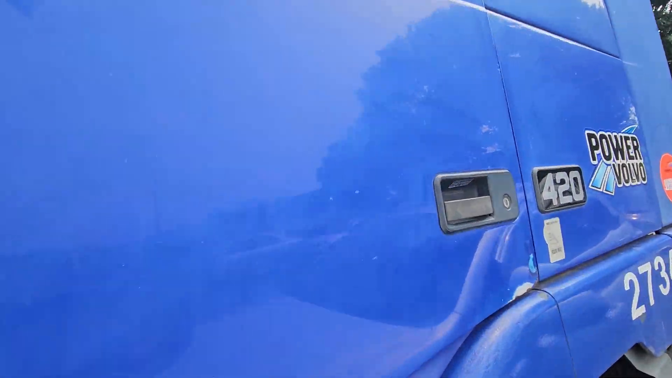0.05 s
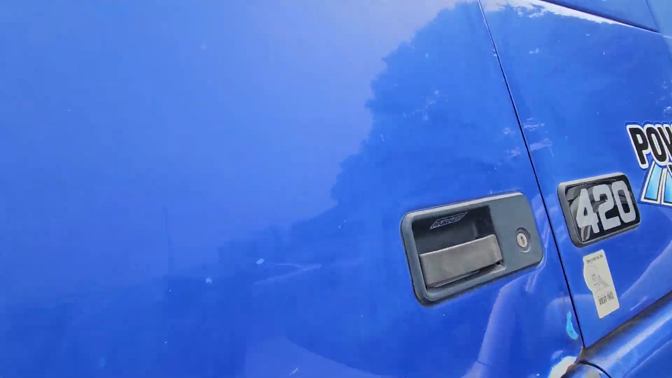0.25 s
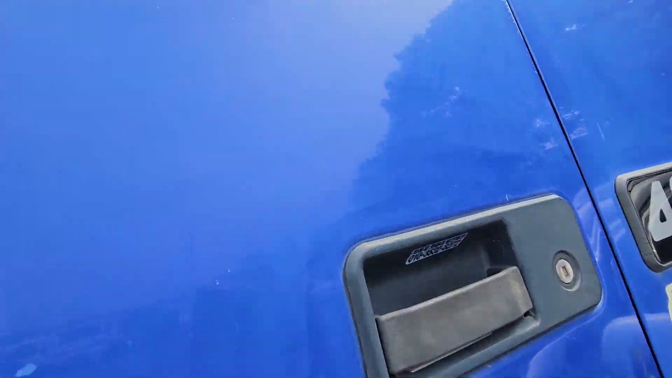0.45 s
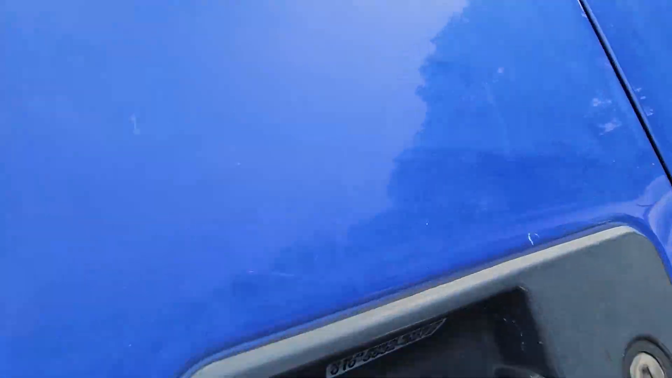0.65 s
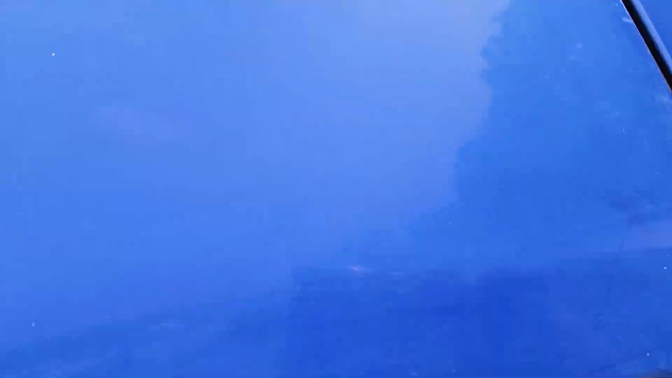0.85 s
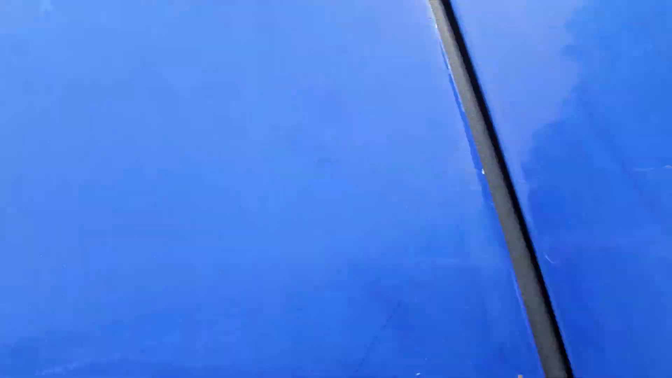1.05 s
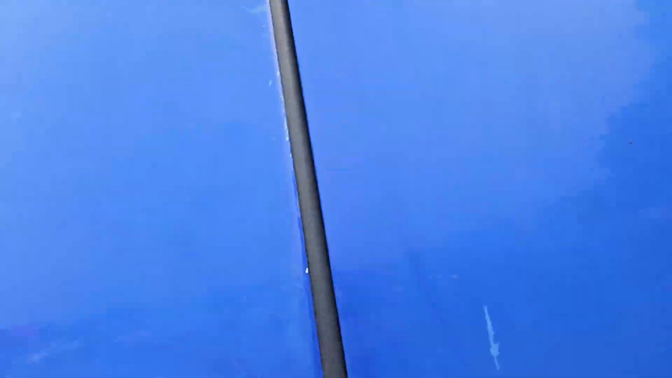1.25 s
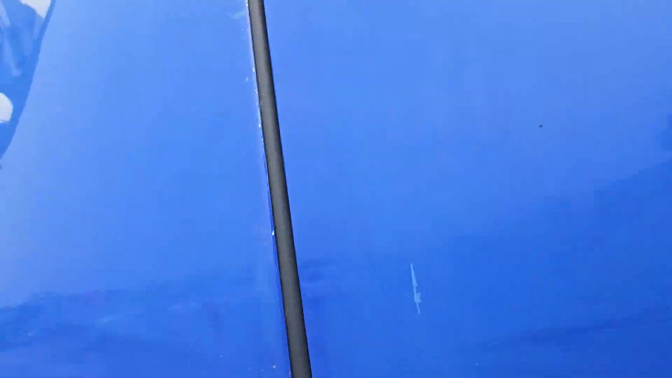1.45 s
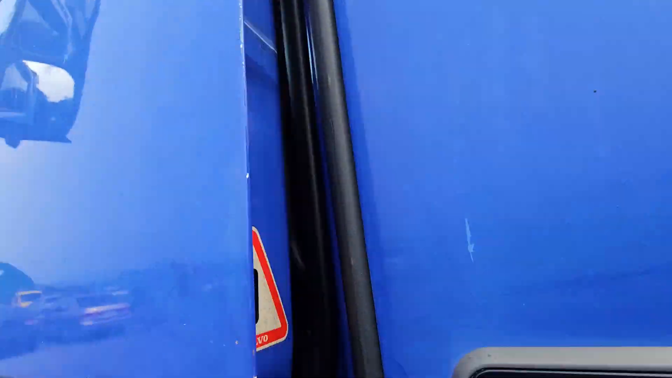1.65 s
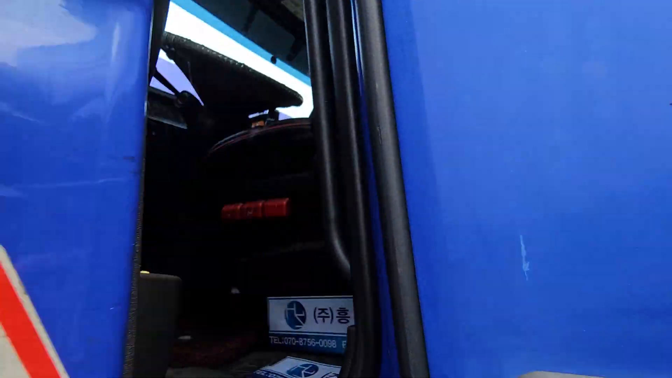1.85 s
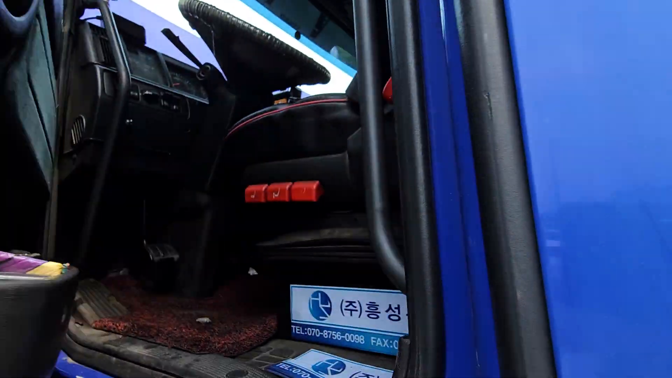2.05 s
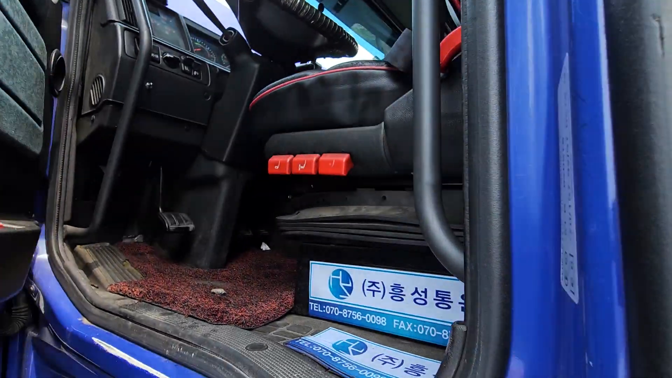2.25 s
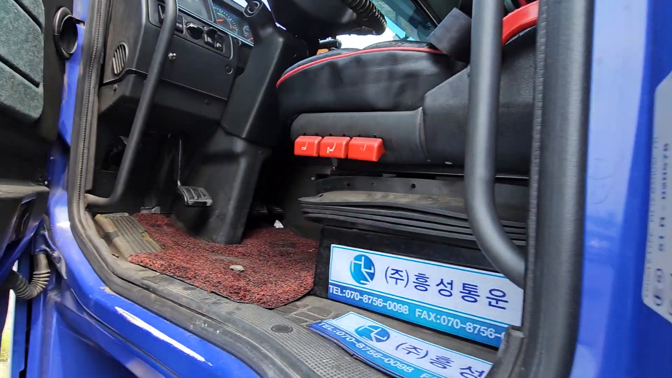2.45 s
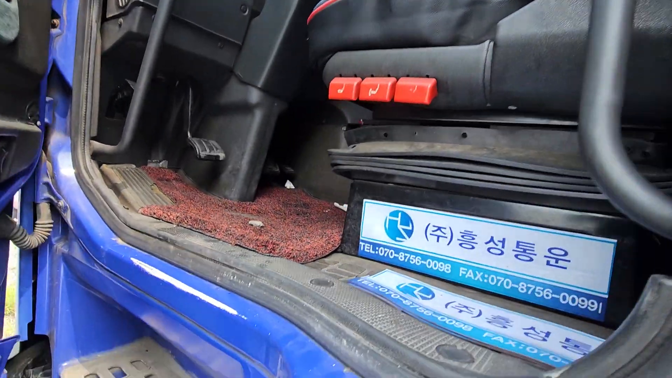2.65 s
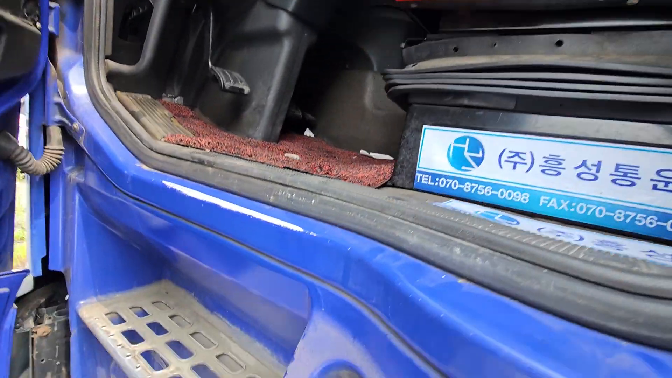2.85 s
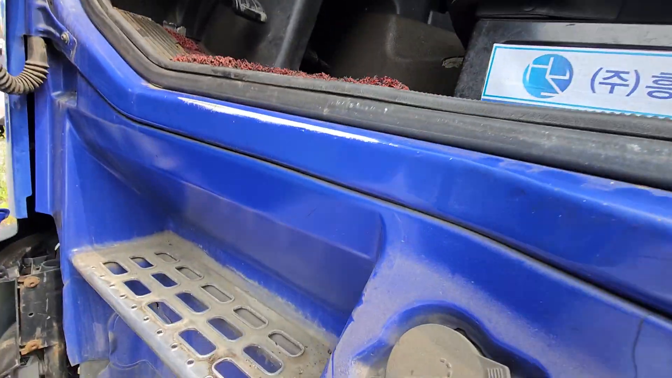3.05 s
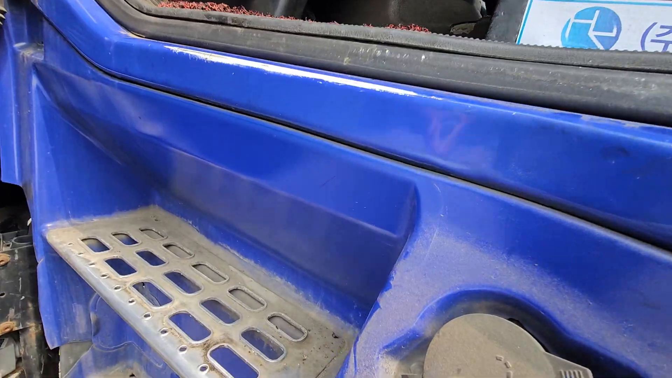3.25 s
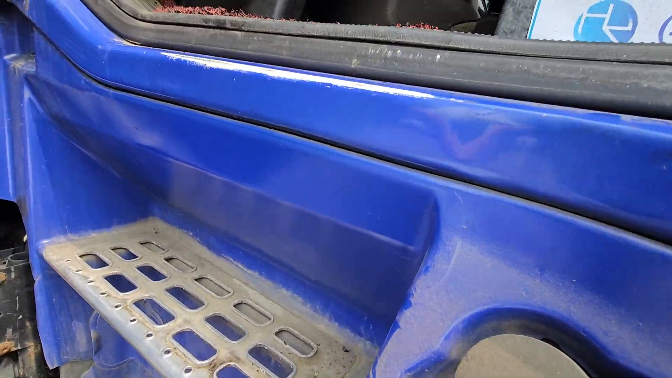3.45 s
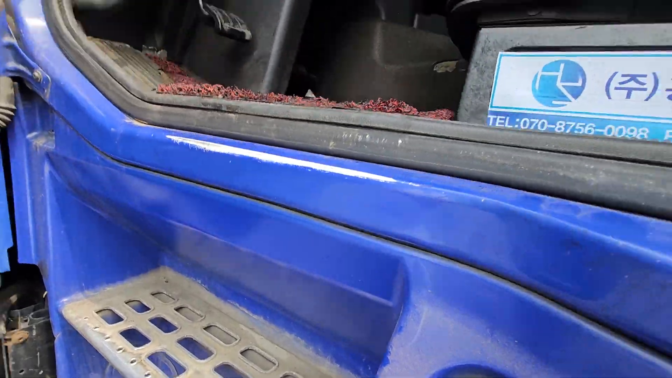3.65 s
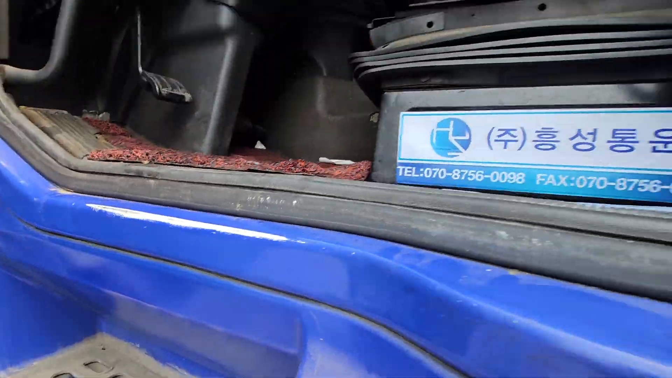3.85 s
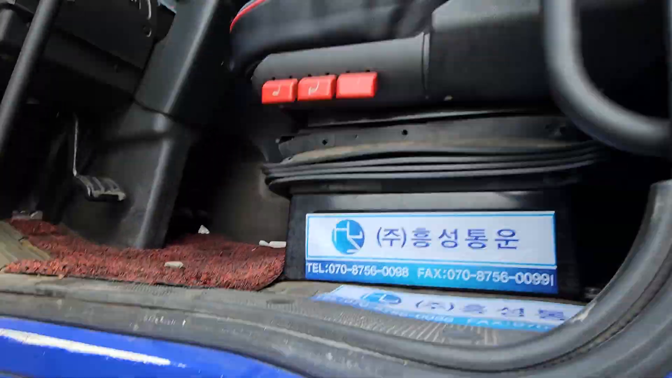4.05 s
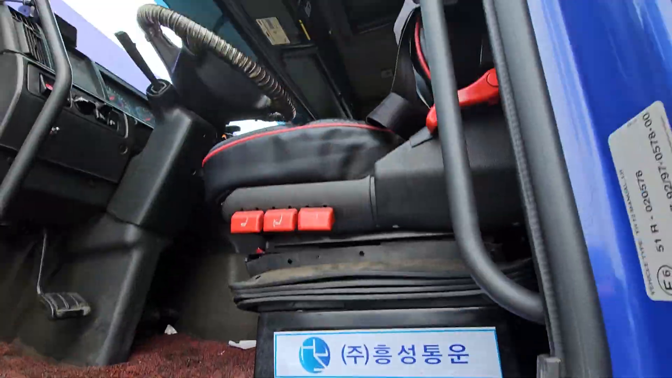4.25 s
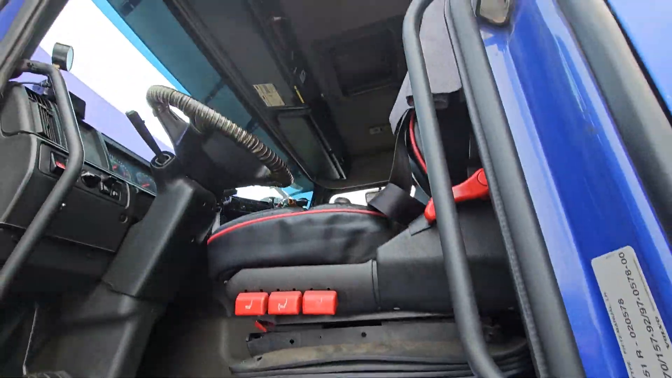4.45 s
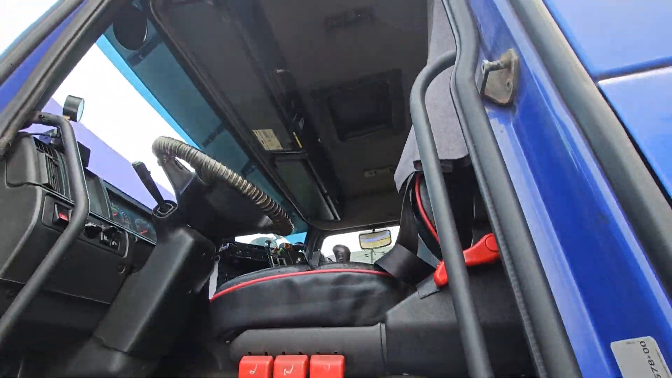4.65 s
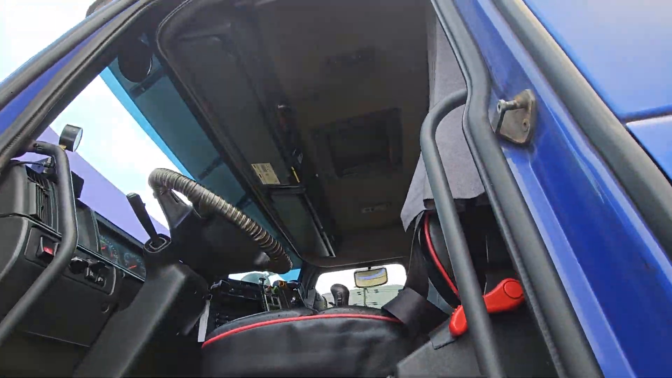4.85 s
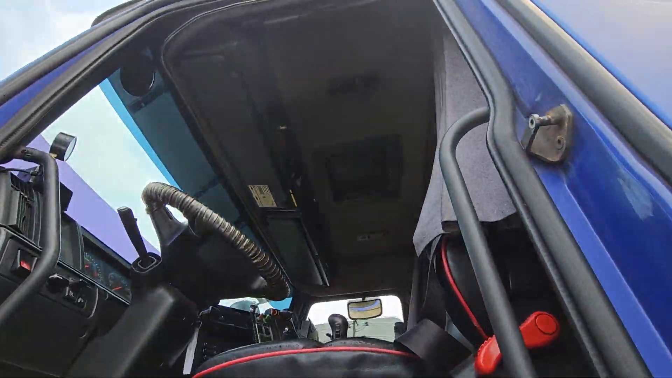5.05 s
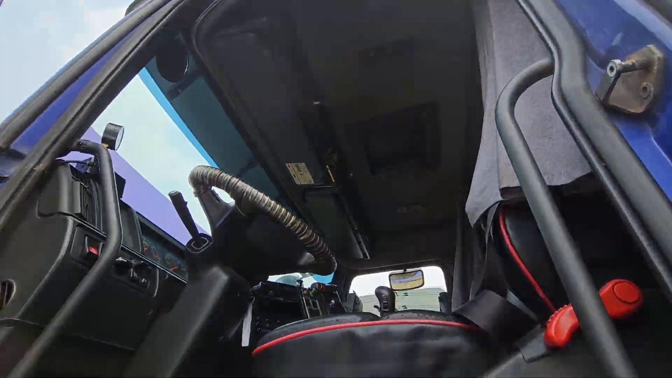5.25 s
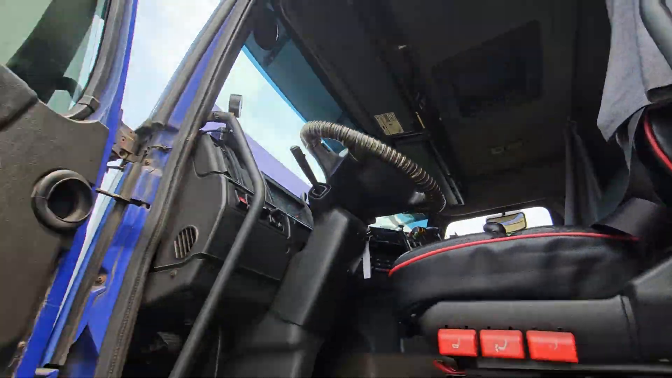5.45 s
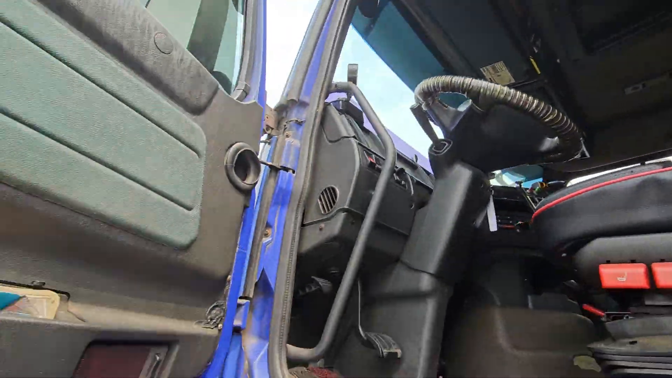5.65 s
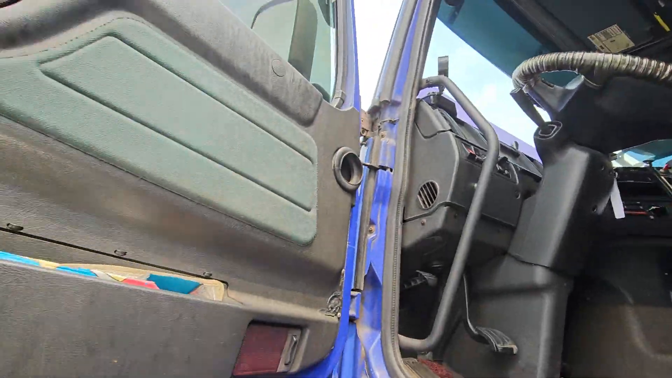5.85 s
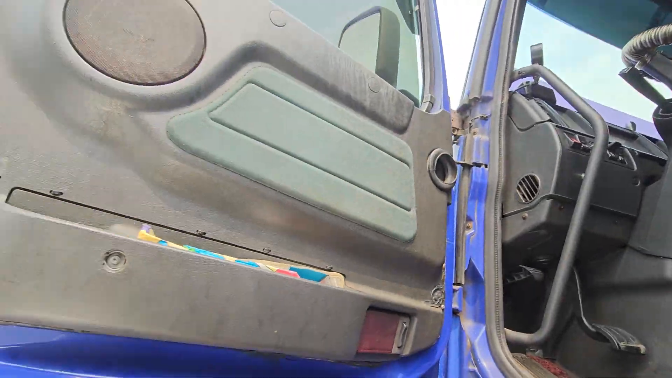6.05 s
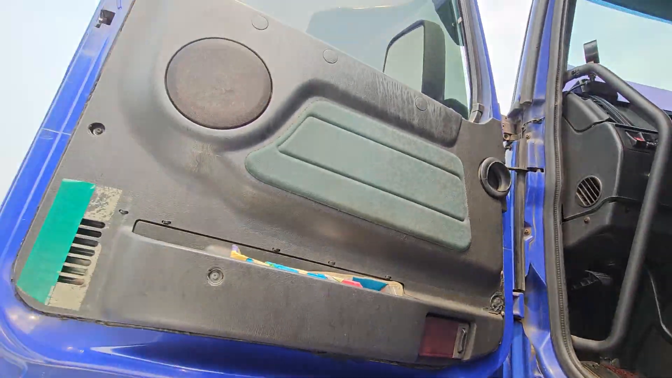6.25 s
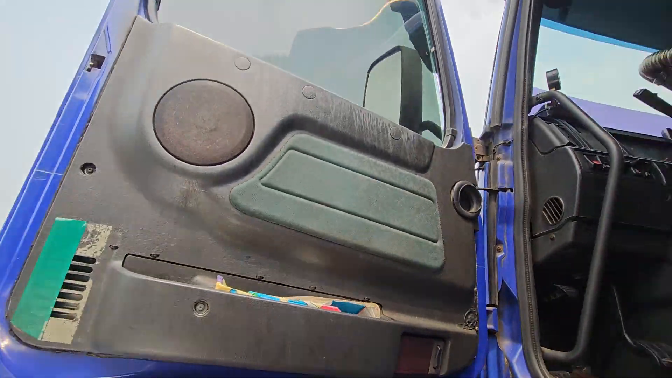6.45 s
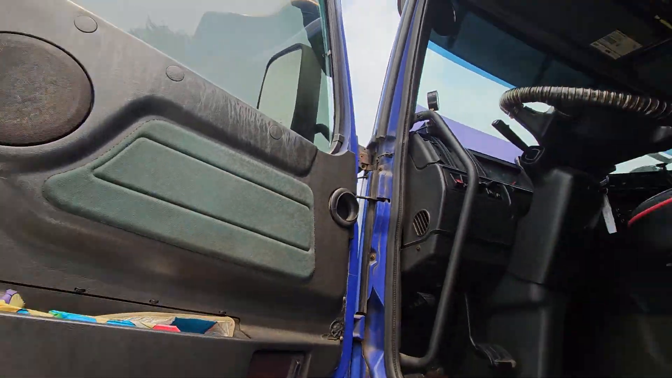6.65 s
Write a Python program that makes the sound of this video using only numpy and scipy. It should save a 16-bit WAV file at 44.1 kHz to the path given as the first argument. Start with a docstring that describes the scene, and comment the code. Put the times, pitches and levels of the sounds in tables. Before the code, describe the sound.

Outdoors, a soft chorus of cicadas hisses under lumpy wind rumble on a hand-held microphone. Close by, fingers tick and tap, then a truck door latch clunks three times in quick succession and the steel door knocks against its stop, ringing briefly. Bumps and scrapes trail off, leaving the cicadas, one of them rasping about once a second with faint pips and a short buzzing note.

```python
"""A heavy truck door unlatches close by in three quick clunks, then swings to its stop: rattling steel
rings the door and booms its skin. Hands, shoes and trim knock and scrape around it in stick-slip bursts,
while wind and handling shake the microphone of a hand-held camera into a lumpy rumble.
Behind it a summer chorus of cicadas hisses in the yard. One nearer cicada rasps about once a second,
and in the second half leads into each rasp with pips and a note pulsed by its tymbals."""
import sys
import numpy as np
from scipy import signal
from scipy.fft import rfft, irfft, next_fast_len
from scipy.io import wavfile
from scipy.ndimage import uniform_filter1d

SR = 44100
rng = np.random.default_rng(int(sys.argv[2]) if len(sys.argv) > 2 else 0)


def wrap_up_sound(samples):
    """Save the sound to the file named by the first command line argument, as 16-bit audio."""
    columns = np.atleast_2d(samples).T
    # keep every value between -1 and 1, then stretch to whole-number steps
    tamed = np.clip(columns, -1, 1)
    steps = np.round(tamed * 32767).astype(np.int16)
    wavfile.write(sys.argv[1], SR, steps)


N = 295915
CREST_DB = 6  # allowance for the peak of a rattle or rub over its mean


def blow(s, db, clank_hz, clank_db, knock_hz, knock_db, crack_hz, crack_db,
         top_db, thud_db, pan_db, held, t60):
    """Steel strikes steel and rattles: the clicks ring the door, crack in the treble and thud the panel."""
    # Modes of the sheet steel and latch. Each row: pitch in Hz, gain in dB, nominal t60 in seconds.
    modes = [(534, -2, 0.2), (1126, -0.5, 0.019), (1296, 3, 0.23), (1685, -13.5, 0.084), (2105, -30.5, 0.1),
             (2742, -15.5, 0.032), (4620, -13, 0.078), (4280, -26, 0.077), (4820, -9, 0.14),
             (5365, -0.5, 0.075), (6078, -24, 0.088), (7365, -4.5, 0.096), (7650, -25.5, 0.07),
             (9160, -11.5, 0.016)]
    t = np.arange(int(.3 * SR)) / SR
    fade = gain_of(-60 * np.maximum(t - held, 0) / t60)
    shape = (fade + 0.79 * gain_of(-60 * t / 0.00803)) * np.minimum(t / .0003, 1)
    rattle = evened(grit(len(t), 0.27, 5.8)) * shape
    fizz = rng.standard_normal((2, len(t))) * shape
    ring = sum(gain_of(mode_db) * resonate(rattle, hz, 5.0 / mode_t60 + 0.0056 * hz)
               for hz, mode_db, mode_t60 in modes)
    crack = evened(band(rattle + .5 * fizz, 2700, 6900))
    crack += 4.3 * evened(band(resonate(rattle, crack_hz, 900), 1890, 7000))
    layers = [(-6, band(ring, 300, 9500)),
              (clank_db, resonate(rattle * fade ** 2.0, clank_hz, 220)),
              (knock_db, resonate(rattle * fade ** 0.27, knock_hz, 310)),
              (crack_db, crack),
              (top_db, band((rattle + 1.1 * fizz) * fade ** 0.66, 10000, 13500)),
              (thud_db, band(rattle[[0, 0]], 163, 540))]
    # the layers are balanced on their first 7 ms
    hit = sum(gain_of(db + layer_db - CREST_DB) * x / np.sqrt((x[:, :300] ** 2).mean())
              for layer_db, x in layers)
    return s, pan(pan_db) * hit


def boom(s, hz, db):
    """A pushed door skin rings hollow: one mode swells, sags a little in pitch and dies."""
    t = np.arange(int(.4 * SR)) / SR
    t60 = 0.26 * (112 / hz) ** 0.95  # higher rings die sooner
    shape = (1 - np.exp(-t / 0.004)) * gain_of(db - 60 * t / t60)
    return s, shape * np.sin(2 * np.pi * (hz * (t - 0.18 * t ** 2) + rng.random()))


def knock(s, db, hz, tap_db, thump_db, scratch_db, fizz_db, pan_db, rub):
    """A short rub sends stick-slip clicks into a dull body; finer slips scratch in the treble."""
    tap_hz, thump_hz, rise_s = 1340, 230.2, 0.0018
    t = np.arange(int(.2 * SR)) / SR
    slips, fine = evened(grit(len(t), .15, 3.4)), evened(grit(len(t), 0.33, 3.2))
    layers = [(0, band(resonate(slips, hz, 0.42 * hz), 120, 4200)),
              (tap_db, band(resonate(slips, tap_hz, 650), 780, 1800)),
              (thump_db, resonate(resonate(slips[[0, 0]], thump_hz, 330), thump_hz, 150)),
              (scratch_db, band(band(fine, 2000, 5200), 2000, 5200)),
              (fizz_db, band(fine, 7900, 16000))]
    t60 = 0.0407 + 4 * abs(rub)
    shape = np.minimum(t / rise_s, 1) * gain_of(-60 * np.maximum(t - rub, 0) / t60)
    scrape = sum(gain_of(db + layer_db - CREST_DB) * evened(x) for layer_db, x in layers)
    return s, pan(pan_db) * shape * scrape


def tick(s, db, low_db, pan_db):
    """Fingers and cloth catch on the camera: a few milliseconds of dry, bright crackle."""
    t = np.arange(int(0.033 * SR)) / SR
    snap = grit(len(t), 0.94, 1.1)
    crackle = evened(band(snap, 9000, 22000)) + gain_of(low_db) * evened(band(snap, 1900, 7500))
    return s, pan(pan_db) * gain_of(db - CREST_DB - 60 * t / 0.022) * crackle


def squeak(s, length, hz, db):
    """A faint squeak: noise in one narrow resonance, eased in and out."""
    tone = resonate(rng.standard_normal((2, int(length * SR))), hz, 36)
    return s, gain_of(db) * evened(tone) * signal.windows.tukey(tone.shape[1], .5)


def cab_echo(dry):
    """The cab throws the sound back as a short, dark scatter of reflections."""
    t = np.arange(int(.3 * SR)) / SR
    taps = band(grit(len(t), .05, 0) * gain_of(-60 * t / 0.19) * (t > .004), 150, 1900)
    return gain_of(-20.0) * signal.oaconvolve(dry, taps / np.linalg.norm(taps[0]), axes=1)[:, :N]


def truck():
    """The door and the handling around it, with the cab's echo, reaching the left microphone port first."""
    # Three latch clunks, then the stop and its bounce. Each row: start in seconds, level in dB, clank in
    # Hz and dB, knock in Hz and dB, crack in Hz and dB, top crack in dB, thud in dB, left over right
    # in dB, rattle hold in seconds, t60 in seconds.
    blows = [(1.485, -7.5, 1840, -5.5, 540, -1.5, 5400, -37, -16, -1, -3, 0.0031, 0.035),
             (1.526, -8, 2100, -13.5, 1230, -0.5, 3040, -12.5, -8, -29.5, 4, 0.0036, 0.045),
             (1.564, -6.5, 1990, -9, 1060, -6.5, 2946, -11.5, -17.5, -20.5, 1.5, 0.0053, 0.057),
             (2.227, -5.5, 2220, -4, 1180, -15, 3660, -3, -14, -11.5, 4.5, 0.0017, 0.054),
             (2.237, -18.5, 1670, -0.5, 530, -6.5, 4410, -40, -16, -9, -12.5, 0.0035, 0.046)]
    # Stereo lean of the blows. Each row: frequency in Hz, left over right in dB.
    balance = [(60, 0.5), (110, -4), (200, 1.5), (380, 9), (700, 6), (1290, -7.5), (2380, -10),
               (4400, -4.5), (8120, -4.5), (15000, 5)]
    # Hands, shoes and trim. Each row: start in seconds, level in dB, body pitch in Hz, then tap, thump,
    # scratch and fizz in dB against the body, left over right in dB, rubbing time in seconds.
    knocks = [(0.031, -54, 470, 6.5, -1, -14, -18, 3, 0.015),
              (0.146, -54, 474, -9, -1, -14, -18, -3, 0.014),
              (0.318, -34.5, 619, -9, -11, -20, -16, 3, 0.013),
              (0.332, -28.5, 690, -17, -12, -34, -12, -1, 0.013),
              (0.345, -29, 880, 0, -1.5, -16, -8, -2.5, 0.0097),
              (0.423, -43, 447, -12, 4.5, -16, -13, 1.5, 0.02),
              (0.643, -42.5, 570, 0.5, 2, -12, -18, -5.5, 0.014),
              (0.677, -47.5, 568, -3, 9, -14, -18, -2, 0.018), (0.731, -42, 468, 1, 4, -8, -16, -3, 0.013),
              (0.934, -49.5, 1010, -7, -5, -5, -8, 0.0, 0.019),
              (0.964, -43, 790, -18, 0, 1.5, -1, -4, 0.023),
              (1.01, -42.5, 517, -6, -2, -16, -14, -7, 0.021),
              (1.052, -38, 678, -6, 8.5, -14, -18, 5, 0.012),
              (1.086, -34, 463, -12, 5.5, -14, -28, 1.5, 0.012),
              (1.118, -49, 511, -16, 2, -3, -18, -3, 0.014),
              (1.228, -39.5, 506, -0.5, 9, -12, -10, -0.5, 0.013),
              (1.249, -38, 547, -15, 0, -17, -15, -1.0, 0.017),
              (1.301, -36.5, 440, 3.5, -8, -9, -18, -3, 0.0063),
              (1.35, -34.5, 560, -21, 0, -13, -12, -1.5, 0.011),
              (1.436, -29.5, 1070, 2, -9, -8, -27, -2.5, 0.021),
              (1.456, -19.5, 450, -4.5, 0, -26, -18, 2.0, 0.017),
              (1.493, -20.5, 466, -13, -1.5, -16, -24, 4, 0.01),
              (1.503, -15, 720, -12, -15.5, -23, -20, -2, 0.016),
              (1.538, -26.5, 694, -7, 1.5, -2, -14, 2, 0.024),
              (1.587, -30.5, 610, -18, 1, -18, -28, -6, 0.011),
              (1.697, -42, 500, -17, -3.5, -23, -27, -3, 0.016),
              (1.775, -38, 498, -26, -9, -29, -29, -4.5, 0.0086),
              (2.236, -14, 493, -0.5, -7.5, -12, -32, 3, 0.013),
              (2.263, -33, 570, -21, -14, -24, -33, -3, 0.018),
              (2.288, -30, 850, -18, -5, -19, -32, -5, 0.021),
              (2.317, -33.5, 438, -7, 6, -9.5, -32, -8, 0.011),
              (2.358, -49, 441, -7, 4, -12, -18, -4, 0.014),
              (2.436, -26, 830, -6, 1.5, -26, -32, -3.0, 0.011),
              (2.453, -27, 435, -9, -6.5, -22, -31, 2, 0.017),
              (2.468, -28, 785, -10, -4.5, -21, -30, -8, 0.018),
              (2.493, -28.5, 640, -11, -1, -14, -27, -3.5, 0.013),
              (2.593, -47.5, 560, -19, 6, -9, -8, -18, 0.0057),
              (2.626, -42, 536, -8, -13, -4, -6, -2.5, 0.012),
              (2.646, -41.5, 1050, 1.5, 0, -7, -4, -0.5, 0.0079),
              (2.686, -44, 437, -5, 0, -17, -6, 0, 0.014),
              (2.742, -47, 674, -16, 4.5, -14, -15, -9, 0.0094),
              (2.849, -33, 846, -20, -23, -14, -29, 0, 0.011),
              (2.861, -31, 900, -22, -11, -12, -36, -6.5, 0.024),
              (2.888, -28.5, 900, -14, -7.5, -12, -37, -1.5, 0.021),
              (2.921, -37, 1040, -5, 1, -12, -33, 3, 0.01),
              (2.969, -27.5, 850, -5, -9, -18, -34, -1, 0.0059),
              (3.159, -46.5, 501, -12, -3, -16, -10, 3, 0.019),
              (3.206, -43, 500, -25, -8, -21, -12, -5, 0.014),
              (3.227, -41, 482, -18, -8, -20, -6, -1, 0.016),
              (3.368, -36, 474, -18, -2, -14, -17, -1.5, 0.013),
              (3.397, -37.5, 450, -18, 0, -16, -11, 0, 0.014),
              (3.433, -39, 500, -29, -8, -21, -16, -3.0, 0.012),
              (3.458, -54, 541, -6, -5, -14, -18, 3, 0.014), (3.5, -48, 441, -16, -2, -16, -14, -5, 0.017),
              (3.533, -51, 775, -15, -7.5, -18, -17, -6, 0.009),
              (4.057, -53, 514, -12, 4.5, -10, -17, -6, 0.014),
              (4.242, -56, 447, -11, 2, -14, -20, 0.5, 0.011),
              (4.357, -58, 627, -3, 2, -10, -19, -6.5, 0.01),
              (5.727, -56, 435, -7, -4, -16, -21, -1.5, 0.0084),
              (6.567, -52.5, 1040, -0.5, -2, -16.5, -18, 1.5, 0.027),
              (6.624, -50, 503, -14, -2, -14, -18, 0, 0.012)]
    # Rings of the door skin. Each row: start in seconds, pitch in Hz, level in dB.
    booms = [(.65, 112, -30), (.75, 122, -32.5), (1.051, 139, -23), (1.458, 111, -30), (1.49, 109, -18),
             (1.525, 127.5, -19.5), (1.631, 121.8, -28), (2.224, 330, -16.5), (2.235, 98.2, -20),
             (2.236, 176.5, -19), (2.238, 519, -14.5), (2.278, 115.2, -18), (2.285, 250.4, -22),
             (2.336, 135.3, -25.5), (2.415, 121, -28), (2.455, 281.2, -24.5)]
    # Fingers and cloth. Each row: start in seconds, level in dB, lower band against upper in dB,
    # left over right in dB.
    ticks = [(0.1015, -42.5, 9.5, -5), (0.3242, -33, -11, -10), (0.3427, -30.5, -4, -18),
             (0.386, -35, -4, -11), (0.4155, -40, -5, -12), (0.4404, -35, -15, -10), (0.4994, -38, -3, -8),
             (0.5447, -39, -12, -9), (0.5694, -47, -9, -7), (0.6455, -40, 1, -15), (0.6556, -30, -22, -12),
             (0.7861, -46, -5, -12), (0.8265, -49, 1, 1), (0.9038, -46, 4, -3), (0.925, -35, 3, -3),
             (1.0485, -25, -3.5, 2), (1.0894, -53, 3, -2.5), (1.2002, -39, 0, -6), (1.2287, -36, 3, 1.0),
             (1.2997, -48.5, 18, -3), (1.4566, -32.5, 10, -2), (2.438, -44.5, 14.5, -5),
             (2.6449, -47, 2, -1.5), (2.689, -38, 4, -1.5), (2.7294, -39, -4, -3.5), (2.9673, -45.5, 11, 8),
             (3.1694, -39, -6, -4), (3.2166, -37, -11, -5), (3.2594, -41, -10, -5),
             (3.3174, -32, -25, -1.0), (3.3742, -47, -2, -0.5), (3.4194, -52, -1, 0.0),
             (6.628, -39, -11, 1)]
    # Small squeaks. Each row: start in seconds, length in seconds, pitch in Hz, level in dB.
    squeaks = [(0.44, 0.075, 1400, -59), (0.858, 0.11, 1800, -56), (1.319, 0.083, 1740, -61),
               (1.87, 0.07, 1800, -61)]
    mix = np.zeros((2, N))
    for row in blows:
        add(mix, *blow(*row))
    mix = filtered(mix, lambda hz: pan(read(balance, hz)))
    for source, rows in (knock, knocks), (boom, booms), (tick, ticks), (squeak, squeaks):
        for row in rows:
            add(mix, *source(*row))
    left, right = mix + cab_echo(mix)
    lag_s, corner_hz = 0.0004647, 1020.0  # the treble lags; the bass reaches both ports together
    late = filtered(right, lambda hz: np.exp(-2j * np.pi * lag_s * hz ** 3 / (hz ** 2 + corner_hz ** 2)))
    return np.array([left, late])


def rumble():
    """Gusty wind, camera jolts, a drumming door panel and the grip: lumpy bass, near the centre."""
    # Levels of the rumble. Each row: time in seconds, wind in dB, door panel in dB, grip in dB.
    levels = [(0.0, -45, -52, -59.5), (0.88, -44.5, -40.5, -46.5), (1.25, -47, -46, -47),
              (1.61, -41, -38, -42), (1.74, -41, -50, -48), (1.98, -47, -57, -57.5),
              (2.24, -54, -58, -56.5), (2.39, -45, -42, -43), (2.75, -48.5, -51.5, -54),
              (3.16, -40, -48, -52.5), (3.44, -45.5, -51.5, -59), (4.39, -41.5, -52, -57.5),
              (4.91, -52.5, -51.5, -58), (5.38, -48, -50, -53), (5.66, -51.5, -52.5, -59),
              (6.09, -51.5, -56, -62.5), (6.39, -55.5, -54.5, -57), (6.71, -50, -57, -59.5)]
    # Wind on the microphone ports. Each row: frequency in Hz, spectral level in dB.
    wind_colour = [(15, -11), (28, 0), (45, 6.5), (70, 3.5), (100, -10.5), (160, -50.5)]
    # A hand on the camera body. Each row: frequency in Hz, spectral level in dB.
    grip_colour = [(100, -26), (170, 1.5), (240, -0.5), (290, -8), (360, -19), (600, -53)]
    # Jolts of the camera, heard as lumps of deep bass. Each row: centre in seconds, level in dB.
    bumps = [(.37, -41), (.69, -42), (1.5, -23), (1.55, -26), (1.94, -38), (2.26, -35), (2.5, -42),
             (2.6, -41.5), (3.1, -43), (3.31, -43), (3.36, -36), (3.999, -39), (5.55, -39.5), (6.629, -44)]
    panel_hz, jolt_s, gust_db = 112, 0.022, 2.5
    s, wind_db, panel_db, grip_db = np.transpose(levels)
    t = np.arange(N) / SR
    wind = noise(lambda hz, _: read(wind_colour, hz)[:, None], 0.91, 0.31, size=4096)
    grip = noise(lambda hz, _: read(grip_colour, hz)[:, None], 0.91, 2.3, size=2048)
    shake = noise(lambda hz, _: read(grip_colour, hz * 2)[:, None], 1.0, 1.8, size=2048)  # an octave down
    panel = evened(resonate(shake, panel_hz + 5.5 * wander(3), 40))
    gusts = gain_of(np.interp(t, s, wind_db) + gust_db * wander(14))
    jolts = sum(gain_of(db) * np.exp(-((t - at) / jolt_s) ** 2) for at, db in bumps)
    mix = (gusts + jolts) * wind + gain_of(np.interp(t, s, panel_db)) * panel
    mix += gain_of(np.interp(t, s, grip_db) + 1.3 * wander(8)) * grip
    return pan(.8) * mix


def chorus():
    """Distant cicadas merge to a hiss whose colour shifts as the camera turns; one tree sings a band."""
    # Cicadas in the trees. Each row: time in seconds, level in dB, share heard past the open door (0-1).
    levels = [(0.0, -47, 0.2), (1.3, -49, 0.05), (2.3, -49.5, 0.25), (2.75, -48, 0.44), (3.81, -50, 0.5),
              (4.17, -47.5, 0.51), (5.21, -47, 0.5), (5.5, -47.5, 0.5), (6.71, -45.5, 0.6)]
    # Their hiss with the door shut. Each row: frequency in Hz, spectral level in dB.
    shut_colour = [(1530, -48.5), (2600, -23.5), (2960, -25.5), (3070, -10.5), (3240, -4), (3820, -6),
                   (4150, -3.5), (4410, -6.5), (4900, 2.5), (5290, -0.5), (7260, 0.5), (8570, -14.5),
                   (9670, -16.5), (11900, -17), (15800, -38)]
    # Their hiss past the open door. Each row: frequency in Hz, spectral level in dB.
    open_colour = [(1530, -36.5), (2600, -18), (3000, -11.5), (3090, -12), (3410, -5), (3820, -10),
                   (4250, 1.5), (4870, -7.5), (6390, -15), (6890, -19), (7430, -14), (8640, -18),
                   (11200, -19.5), (12200, -26), (15800, -39)]
    s, db, share = np.transpose(levels)

    def colour(hz, t):
        turned = np.clip(np.interp(t, s, share), 0, 1)
        return np.outer(read(shut_colour, hz), 1 - turned) + np.outer(read(open_colour, hz), turned)
    t = np.arange(N) / SR
    song = narrow_band(rng.standard_normal((2, N)), hz=4246, width=110)
    song *= gain_of(-14 + 1.5 * wander(3.8)) * (2 * np.interp(t, s, share)) ** 2
    return gain_of(np.interp(t, s, db)) * (noise(colour, 0, 1.6, size=1024) + song)


def tymbal_note():
    """A cicada's tymbals pulse a broken held note that grows louder and flicks up in pitch."""
    # Glide of the note. Each row: time in seconds, tymbal pulse rate in Hz.
    glide = [(0, 345), (.09, 343), (.13, 405), (.15, 425), (.163, 600), (.178, 615)]
    # Harmonics that the belly sounds. Each row: multiple of the pulse rate, level in dB.
    harmonics = [(4, 4), (5, -9), (6, 1.5), (7, -4), (8, 0)]
    t = np.arange(0, glide[-1][0], 1 / SR)
    turns = np.cumsum(np.interp(t, *np.transpose(glide))) / SR
    note, swell_db = 0, 5 * t / t[-1]
    for k, db in harmonics:
        flutter = evened(uniform_filter1d(rng.standard_normal((2, len(t))), size=280))
        drop_db = 53 * (k > 4) * (t > .1)  # upper harmonics drop out in the flick
        partial = np.sin(2 * np.pi * k * turns + 0.91 * flutter[::-1])
        note += gain_of(db + swell_db - drop_db + 3.4 * flutter) * partial
    return evened(note) * signal.windows.tukey(len(t), .08)


def cicada_phrases():
    """The near cicada leads into each held note with seven rising pips that tend to grow louder."""
    # Its phrases. Each row: start of the held note in seconds, note level in dB, base pip level in dB.
    phrases = [(3.3, -84, -70), (4.365, -63.5, -61), (5.385, -65.5, -62), (6.33, -67.5, -63)]
    pip_s, pip_gap_s = 0.031, .076
    mix = np.zeros((2, N))
    t = np.arange(int(pip_s * SR)) / SR
    shape = np.sin(np.pi * t / t[-1]) ** 2
    for s, note_db, pip_db in phrases:
        add(mix, s, gain_of(note_db) * tymbal_note())
        for k in range(1, 8):  # counted back from the note
            hz = rng.uniform(1870, 2230)
            size_db = rng.normal(0, 4.1, (2, 1)) - 1.1 * k
            pip = evened(resonate(rng.standard_normal((2, len(t))), hz * (1 + 6.2 * t), 130))
            add(mix, s - pip_gap_s * k, gain_of(pip_db + size_db) * shape * pip)
    return mix


def cicada_rasps():
    """The near cicada's rasp: a spray of treble clicks that swells briefly and falls away."""
    # Its rasps. Each row: start in seconds, level before the swell in dB.
    rasps = [(.03, -62), (1.25, -60), (2.419, -58.5), (3.471, -61.5), (4.555, -58), (5.58, -58.5),
             (6.52, -56.5)]
    # Colour of a rasp. Each row: frequency in Hz, spectral level in dB.
    colour = [(8000, -27), (9200, -7.5), (12000, -5), (13000, -4), (14500, 1.5), (15800, -3.5)]
    rise_s, peak_s, fall_s = 0.025, .13, .17
    mix = np.zeros((2, N))
    t, hz = np.arange(SR // 2) / SR, np.fft.rfftfreq(SR // 2, 1 / SR)
    swell_db = np.where(t < peak_s, 4 * t / peak_s, 4 - 32.5 * ((t - peak_s) / fall_s) ** 2)
    for s, db in rasps:
        clicks = grit(len(t), .2, 0.78)
        rasp = evened(irfft(rfft(clicks) * gain_of(read(colour, hz)), len(t)))
        add(mix, s, gain_of(db + swell_db) * np.minimum(t / rise_s, 1) * rasp)
    return mix


def hums():
    """Two faint fuzzy hums under the rumble: narrow bands of noise, alike on both sides."""
    # The hums, upper first. Each row: centre in Hz, width in Hz.
    bands = [(240, 25), (142, 30)]
    # Their rise and fall. Each row: time in seconds, upper hum in dB, lower hum in dB.
    levels = [(0, -66, -63), (3.3, -63, -57), (3.7, -58, -59), (4.6, -58, -56.5), (5.6, -60, -54.5),
              (6.1, -68, -57), (6.71, -66, -65.5)]
    s, *curves = np.transpose(levels)
    air = rng.standard_normal((2, 3, N))
    air = air[:, :1] + 0.69 * air[:, 1:]
    return sum(gain_of(np.interp(np.arange(N) / SR, s, db)) * narrow_band(x, hz, width)
               for (hz, width), db, x in zip(bands, curves, air))


def handling_hush():
    """A soft midrange hush of handling and outdoor air, swelling around the door's clunks and scrapes."""
    # Colour of the hush. Each row: frequency in Hz, spectral level in dB.
    colour = [(210, -35), (350, 3), (470, -6), (850, -12.5), (1160, -12), (2050, -8.5), (2610, -23.5),
              (2800, -18), (3640, -37.5), (6160, -120)]
    # Swells of the handling. Each row: time in seconds, level in dB.
    levels = [(0.0, -60.5), (1.05, -57.5), (1.38, -48), (1.85, -61.5), (2.3, -53), (3.12, -59.5),
              (3.4, -55.5), (3.68, -65.5), (4.67, -70.5), (6.32, -65.5), (6.71, -60)]
    hush = noise(lambda hz, _: read(colour, hz)[:, None], 0.11, 3.7, size=1024)
    return gain_of(np.interp(np.arange(N) / SR, *np.transpose(levels))) * hush


def gain_of(db):
    return 10 ** (np.asarray(db) / 20)


def pan(db):
    """Left and right gains, db apart."""
    return gain_of([[db / 2], [-db / 2]]).reshape(2, -1)


def evened(x):
    """Scales to an rms of 1."""
    return x / np.sqrt(np.mean(x ** 2) + 1e-20)


def read(points, hz):
    """Reads a curve along a logarithmic frequency axis."""
    f, value = np.transpose(points)
    return np.interp(np.log(hz + 1), np.log(f + 1), value)


def add(mix, s, sound):
    """Lays a sound into the mix at s seconds."""
    start = round(s * SR)
    sound = sound[..., max(-start, 0):]
    part = mix[..., max(start, 0):][..., :sound.shape[-1]]
    part += sound[..., :part.shape[-1]]


def band(x, lo_hz, hi_hz):
    sos = signal.butter(2, [lo_hz, min(hi_hz, .49 * SR)], "bandpass", fs=SR, output="sos")
    return signal.sosfilt(sos, x)


def filtered(x, response):
    """Multiplies the spectrum by response(hz)."""
    size = next_fast_len(N)
    return irfft(rfft(x, size) * response(np.fft.rfftfreq(size, 1 / SR)), size)[..., :N]


def resonate(x, hz, width):
    """A resonance that can glide, width in Hz: shifts hz down to zero, smooths, and shifts back."""
    turn = np.exp(2j * np.pi * np.cumsum(hz * np.ones(x.shape[-1])) / SR)
    pole = np.exp(-np.pi * width / SR)
    return 2 * (turn * signal.lfilter([1 - pole], [1, -pole], x / turn)).real


def narrow_band(x, hz, width):
    """The same resonance twice over, for steep sides; rms 1."""
    return evened(resonate(resonate(x, hz, width), hz, width))


def noise(spectrum_db, correlation, patchy_db, size):
    """Stereo noise coloured by spectrum_db(hz, t) and mottled with random louder and softer patches."""
    hop = size // 4
    frames, hz = N // hop + 5, np.fft.rfftfreq(size, 1 / SR)
    a, b, c, d, patches = rng.standard_normal((frames, len(hz), 5)).T
    patches = evened(uniform_filter1d(uniform_filter1d(patches, size=8, axis=0), size=8, axis=1))
    left = a + 1j * b
    right = correlation * left + np.sqrt(1 - correlation ** 2) * (c + 1j * d)
    gain = gain_of(spectrum_db(hz, np.arange(frames) * hop / SR) + patchy_db * patches)
    return evened(signal.istft(gain * np.array([left, right]), nperseg=size, noverlap=size - hop)[1][:, :N])


def grit(count, density, spread_db):
    """Random clicks of uneven size, one train shared by both sides and one for each."""
    clicks = gain_of(spread_db * np.minimum(rng.exponential(1, (3, count)), 4))
    clicks *= rng.standard_normal((3, count))
    clicks *= rng.random((3, count)) < density
    return clicks[0] + .5 * clicks[1:]


def wander(top_hz):
    """A slow random drift of rms 1, made of sines up to top_hz."""
    t = np.arange(0, N + 256, 256) / SR
    rates = np.geomspace(top_hz / 8, top_hz, num=24)
    drift = sum(np.sin(2 * np.pi * (hz * t + rng.random())) / np.sqrt(hz) for hz in rates)
    return np.interp(np.arange(N) / SR, t, evened(drift))


def scene():
    """The truck door up close, over the rumble, the hush of handling and the cicadas."""
    return truck() + rumble() + hums() + handling_hush() + chorus() + cicada_phrases() + cicada_rasps()


def record(dry):
    """Clips any peak past full scale, then cuts the top treble steeply."""
    edge_hz = 15830
    lowpass = signal.firwin(1023, edge_hz, window=("kaiser", 9), fs=SR)
    return signal.oaconvolve(np.clip(dry, -1, 1), lowpass[None], "same")


dry = scene()
out = record(dry)
wrap_up_sound(out)
```